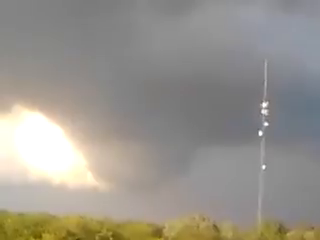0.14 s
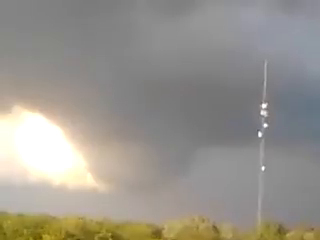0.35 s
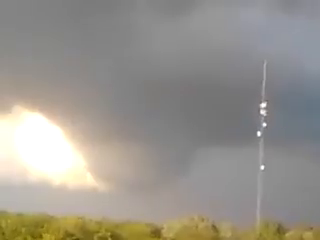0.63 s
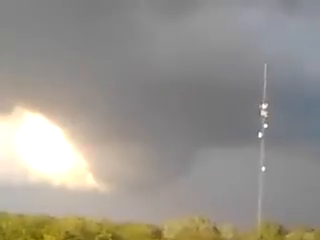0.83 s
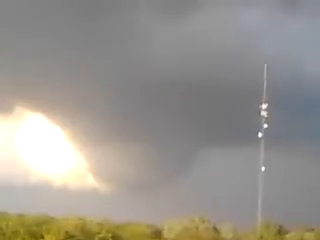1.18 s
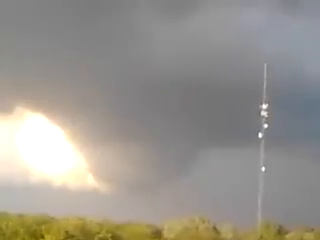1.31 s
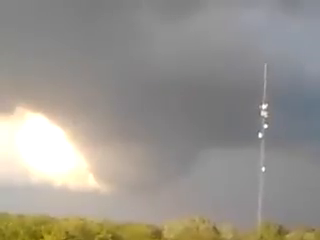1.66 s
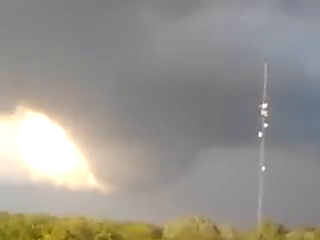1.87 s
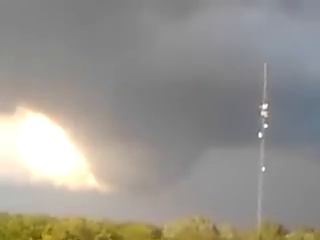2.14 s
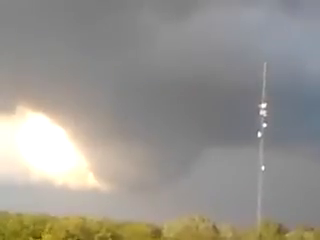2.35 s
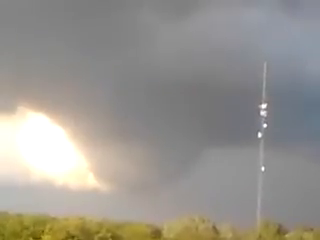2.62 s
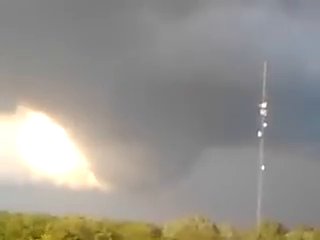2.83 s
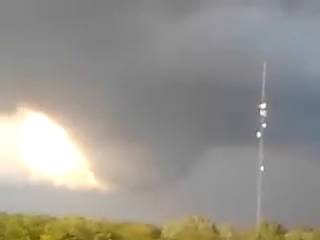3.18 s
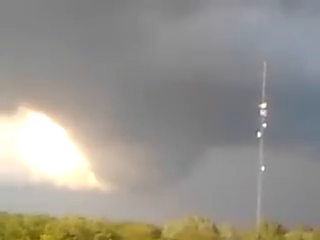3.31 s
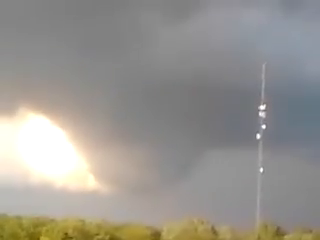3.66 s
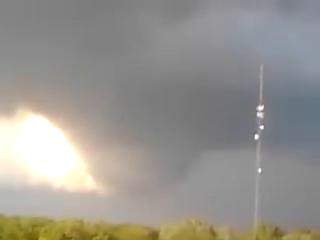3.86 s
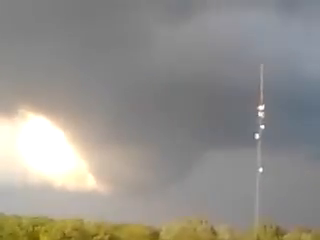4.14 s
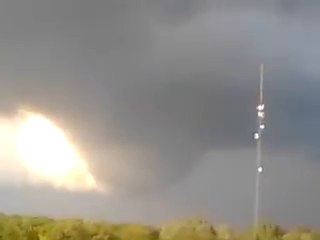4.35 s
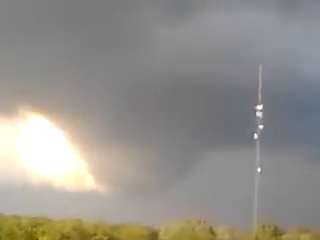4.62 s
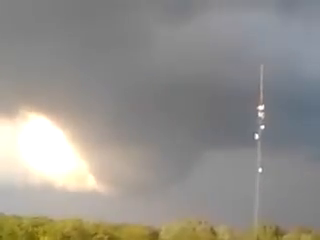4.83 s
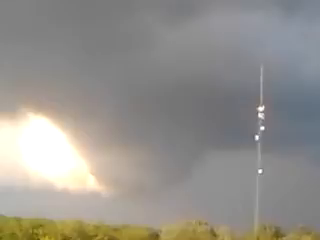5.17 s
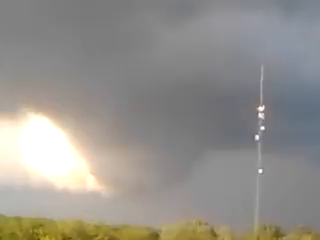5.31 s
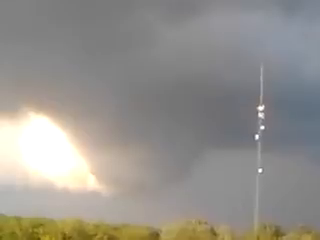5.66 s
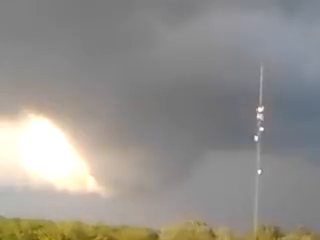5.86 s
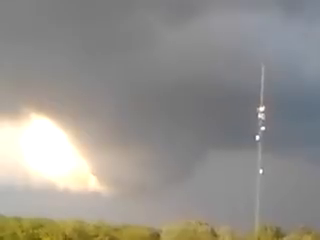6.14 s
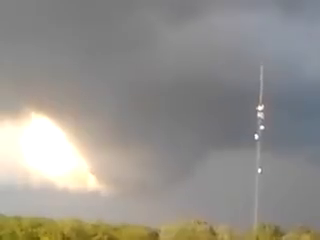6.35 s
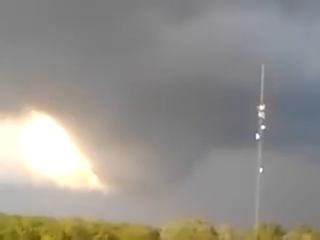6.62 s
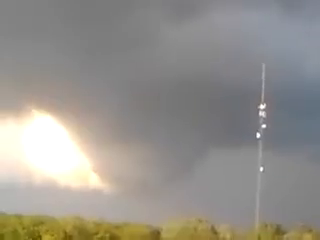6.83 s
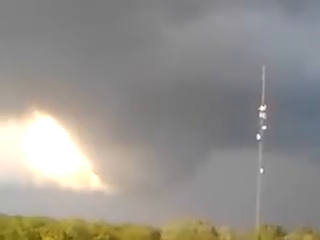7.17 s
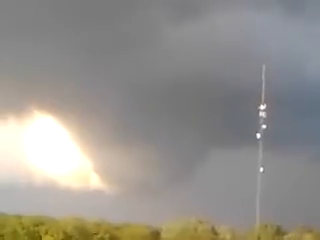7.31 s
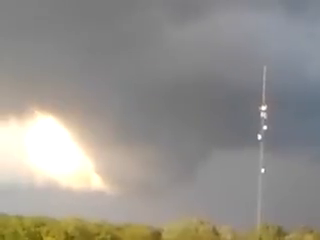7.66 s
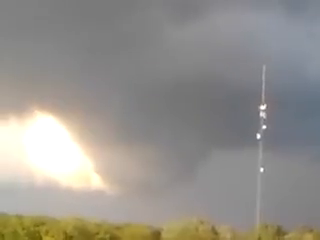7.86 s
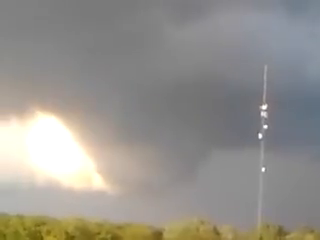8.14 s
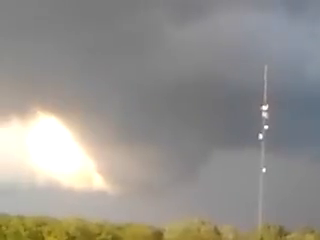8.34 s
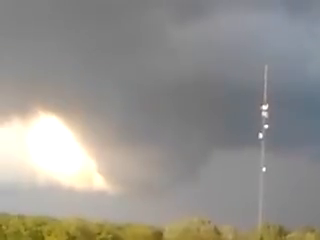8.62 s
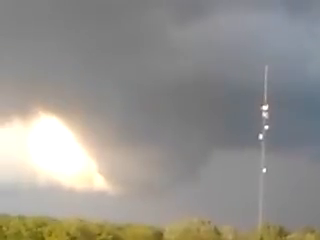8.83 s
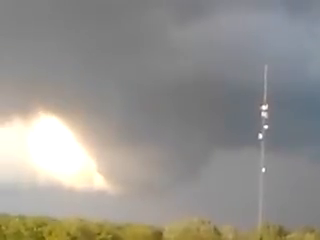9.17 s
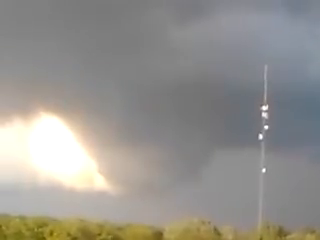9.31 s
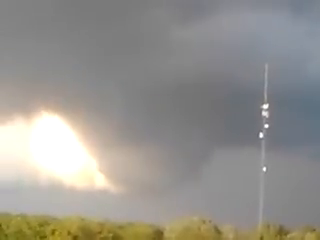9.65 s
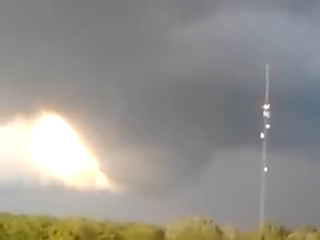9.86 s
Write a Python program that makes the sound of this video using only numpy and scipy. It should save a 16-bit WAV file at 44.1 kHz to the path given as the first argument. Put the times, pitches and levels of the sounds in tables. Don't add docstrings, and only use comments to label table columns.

```python
import sys
import numpy as np
from scipy import signal
from scipy.fft import rfft, irfft, next_fast_len
from scipy.io import wavfile
from scipy.ndimage import uniform_filter1d, map_coordinates

SR = 44100
rng = np.random.default_rng(int(sys.argv[2]) if len(sys.argv) > 2 else 0)


def dump(signal):
    limited = np.clip(np.atleast_2d(signal).T, -1, 1)
    pcm = np.round(limited * 32767).astype(np.int16)
    wavfile.write(sys.argv[1], SR, pcm)


def elevation(decibels):
    levels = np.asarray(decibels, float)
    return 10 ** (levels / 20)


N = 440559
TIME = np.arange(N) / SR

MAINS_HZ = 119.94
TURN_S = 34 / MAINS_HZ
COUNT = 35
FIRST_S, PACE_S = .139, .2837
USUAL = (-44, .092, -47)
CAMERA_SR, FRAME, FRAME_START = 16000, 1024, 21


def unit(x):
    return x / np.sqrt(np.mean(x ** 2) + 1e-20)


def along(points, hz):
    f, v = np.transpose(points)
    return np.interp(np.log(hz + 1), np.log(f + 1), v)


def filtered(x, response):
    m = next_fast_len(N + SR // 2)
    return irfft(rfft(x, m) * response(np.fft.rfftfreq(m, 1 / SR)), m)[..., :N]


def ringing(hz, width, db):
    def response(f):
        total = 0
        for k, (c, w, g) in enumerate(zip(hz, width, db)):
            total = total + (-1) ** k * elevation(g) * 1j * f * w / (c * c - f * f + 1j * f * w)
        return total
    return response


def wobble(rate):
    return map_coordinates(rng.standard_normal(int(N * rate / SR) + 4), [TIME * rate])


def rush(spectrum, patchy_db):
    z = signal.stft(rng.standard_normal(N + 512), nperseg=512)[2]
    field = uniform_filter1d(rng.standard_normal(z.shape), 5, 0)
    field = uniform_filter1d(field, 12, 1)
    patched = signal.istft(z * elevation(patchy_db * unit(field)), nperseg=512)[1][:N]
    return unit(filtered(patched, lambda hz: elevation(along(spectrum, hz))))


def effort(times, db, rise, hold, fall):
    out, t = np.zeros(N + SR), np.arange(SR // 4) / SR
    shape = np.clip(t / rise, 0, 1) ** 2 * np.exp(-np.maximum(t - rise - hold, 0) / fall)
    for s, level in zip(times, db):
        out[round(s * SR):][:len(t)] += elevation(level) * shape
    return out[:N]


def teeth(first_s, sharp):
    return unit(np.exp(sharp * np.cos(2 * np.pi * MAINS_HZ * (TIME - first_s))))


def on_beat(usual, odd):
    rows = np.array([(FIRST_S + PACE_S * k, *usual) for k in range(COUNT)])
    rows[np.round((np.transpose(odd)[0] - FIRST_S) / PACE_S).astype(int)] = odd
    return rows


# pitch in Hz, level in dB.
RUMBLE_TONE = [(15, -20.5), (30, -7), (55, -5), (90, -3), (170, -7), (300, -7.5), (500, -28.5), (800, -57)]
TRAFFIC_TONE = [(200, -38.5), (330, -1), (500, 3), (700, -1), (900, -25.5), (1200, -65)]
TYRE_TONE = [(450, -39), (700, -3), (870, 1), (1000, -2), (1200, -3.5), (1400, -7.5), (1600, -28.5),
             (2200, -63)]
FIELD_TONE = [(900, -39.5), (1500, -2.5), (2300, -4.5), (2800, 1), (3700, -2), (4400, -5.5), (4900, -1),
              (5700, 2.5), (6200, 0), (7100, -3)]
# time in seconds, tyre level in dB, hiss over the tyres in dB.
PASSING = [(0, -54, -16), (1, -56, -11.5), (3.3, -54.5, -11.5), (5.5, -55.5, -11.5), (6.2, -52.5, -11),
           (8, -55, -8.5), (8.6, -51, -8), (9, -50.5, -9.5), (9.3, -48.5, -3.5), (9.47, -47, -6.5),
           (9.6, -49, -8.5), (9.99, -47, -7.5)]


def distance():
    s, *columns = np.transpose(PASSING)
    tyre_db, over_db = [np.interp(TIME, s, c) for c in columns]
    hiss_db = tyre_db + over_db + 1.1 * wobble(2.2)
    traffic = elevation(-53 + 0.96 * wobble(1.5)) * rush(TRAFFIC_TONE, patchy_db=0.86)
    tyres = elevation(tyre_db + 0.07) * rush(TYRE_TONE, patchy_db=1.0)
    field = elevation(-51.0) * rush(FIELD_TONE, patchy_db=1.23)
    hiss_tone = [(900, -31.5), (1200, 3.5), (1500, -1), (2300, -1.0), (3000, -7), (4000, -39.0)]
    hiss = elevation(hiss_db + 1.0) * rush(hiss_tone, patchy_db=-1.4)
    rumble = elevation(-47.5 + 0.55 * wobble(1.5)) * rush(RUMBLE_TONE, patchy_db=1.24)
    return rumble + traffic + tyres + field + hiss


# start in seconds, level in dB, pitch in Hz.
KNOCKS = [
    (1.072, -34.5, 103),
    (5.621, -32, 88.7),
]


def bumps():
    out = np.zeros(N)
    for s, db, hz in KNOCKS:
        since = np.maximum(TIME - s, 0)
        out += elevation(db - 60 * since / 0.26) * np.sin(2 * np.pi * hz * since)
    return out


# multiple of the motor pitch, peak level in dB.
MOTOR = [(1, -49), (2, -46), (3, -59), (4, -61), (5, -65)]
# pitch in Hz, peak level in dB.
CASING = [(74.53, -55), (356.31, -62), (359.83, -64), (871, -67), (1191, -66)]


def machine():
    motor_hz, lead_s = 59.285, .00208
    sag_at, sag_wide, sag_db, sag_hz = .705, .06, 9.3, 10
    load_at, load_wide, load_hz = .43, .16, 6.2
    turn = TIME / TURN_S % 1
    sag = np.exp(-((turn - sag_at) / sag_wide) ** 2)
    load = np.exp(-((turn - load_at) / load_wide) ** 2)
    mean_hz = np.sqrt(np.pi) * (sag_hz * sag_wide - load_hz * load_wide)
    level_db = -42.7 + np.cos(2 * np.pi * (turn - .42)) - sag_db * sag
    hum_hz = MAINS_HZ + sag_hz * sag - load_hz * load - mean_hz
    hum = elevation(level_db) * np.cos(2 * np.pi * np.cumsum(hum_hz) / SR)
    motor = sum(elevation(db) * np.cos(2 * np.pi * k * motor_hz * (TIME + lead_s)) for k, db in MOTOR)
    casing = sum(elevation(db) * np.cos(2 * np.pi * hz * TIME) for hz, db in CASING)
    return hum + motor + casing


def tick():
    starts = .182 + TURN_S * np.arange(COUNT)
    tick_db = -61.5 + .5 * starts + 2.5 * rng.standard_normal(COUNT)
    pressure = effort(starts, tick_db + 19, rise=0.0079, hold=0.017, fall=0.0062)
    drive = pressure * teeth(.2025, sharp=0.93)
    return filtered(drive * rng.standard_normal(N), ringing(hz=[2930, 3150], width=[330, 300], db=[0, -5]))


BUZZ_HZ = [4936, 5197, 5305, 5394, 5427, 5453, 5512, 5564, 5641, 5668, 5757, 5827, 5924, 6050, 6177, 6800,
           5550]
# width in Hz, level in dB.
BUZZ_RING = [(30, -17), (25.2, -8.5), (26.8, -1.5), (13.9, -0.5), (10.8, 0), (14, -9.5), (22, -11),
             (12.3, 2.5), (18.1, -0.5), (20, -7), (12.7, -8), (41.3, -10), (48, -9.5), (40.3, -14),
             (79.6, -24), (680, -27), (466, -18.5)]
# time in seconds, level in dB.
VIGOUR = [(.15, -50), (.43, -54.5), (1.0, -49.5), (1.28, -48), (1.57, -51.5), (1.85, -47), (2.99, -49),
          (3.55, -47.5), (4.69, -52), (4.97, -48), (5.54, -46.5), (6.1, -51), (6.39, -47.5), (7.24, -47.5),
          (7.8, -52.5), (8.94, -49.5), (9.5, -49.5), (9.79, -52)]


def buzz():
    starts = .145 + TURN_S * np.arange(COUNT)
    buzz_db = np.interp(starts, *np.transpose(VIGOUR))
    since = (TIME - starts[0]) % TURN_S
    tooth_row = rng.standard_normal(round(TURN_S * SR) + 1)[(since * SR).astype(int)]
    climb = np.sin(2 * np.pi * (5220 * since + 4300 * since ** 2)) * np.exp(-since / 0.041)
    scrape = 0.7 * tooth_row + 0.65 * rng.standard_normal(N) + 0.6 * climb
    drive = scrape * teeth(.1545, sharp=1.8)
    swell = effort(starts, buzz_db + 20.5, rise=.012, hold=0.015, fall=.024)
    drag = effort(starts, buzz_db + 13.0, rise=0.03, hold=0.056, fall=.065)
    edge = effort(starts + 0.011, buzz_db + 5.5, rise=.02, hold=0.014, fall=.02) * drive
    rasp = signal.lfilter(*signal.butter(2, [5700, 6450], "band", fs=SR), edge)
    return rasp + filtered((swell + drag) * drive, ringing(BUZZ_HZ, *np.transpose(BUZZ_RING)))


STROKE_HZ = [3959, 4015, 4091, 4131, 4200, 4365, 4443, 4489, 4560, 4060, 4270]
# width in Hz, first stroke in dB, second stroke in dB.
STROKE_RING = [(24.4, -3, -31.5), (26, -4.5, -16.5), (19.9, 0, -10.5), (20.2, -1.5, -7.5),
               (24.7, -10, -16.5), (17.2, -2.5, -10), (9.74, 6, 3.5), (14.7, -5.5, -3), (151, -14.5, -19),
               (264, -13.5, -25.5), (120, -14.5, -21.5)]


def stroke(pressure, scrape, db, held_db):
    modes = ringing(STROKE_HZ, np.transpose(STROKE_RING)[0], db)
    song = unit(filtered(scrape, modes))
    even = song / np.sqrt(np.abs(uniform_filter1d(song ** 2, size=600)) + 0.036)
    return filtered(pressure * scrape, modes) + elevation(held_db) * pressure * even


# start in seconds, first stroke in dB, wait in seconds,
# second stroke in dB.
CHIRPS = [(0.141, -43.5, 0.1, -46.5), (0.428, -42, 0.1, -45), (0.707, -42.5, 0.099, -45),
          (0.991, -44.5, 0.088, -49), (1.277, -45, 0.086, -48), (1.55, -46.5, .093, -46),
          (2.126, -43, .082, -46), (2.413, -43.5, .074, -45), (2.689, -44, 0.087, -44.5),
          (2.975, -45.5, 0.083, -43.5), (3.254, -44.5, 0.089, -46), (3.547, -43, 0.083, -46),
          (3.822, -43, 0.097, -52), (4.106, -44.5, 0.1, -49), (4.389, -46, .097, -45.5),
          (4.678, -46.5, .092, -44.5), (4.963, -45, 0.1, -49.5), (5.247, -43.5, 0.1, -49.5),
          (5.536, -44, 0.08, -47), (6.097, -41.5, .096, -46), (6.666, -44.5, .088, -44),
          (7.236, -42.5, 0.094, -48), (7.521, -41, 0.095, -46), (8.087, -43.5, .096, -44),
          (8.365, -43.5, .1, -46), (8.651, -44.5, 0.097, -49.5), (8.939, -43.5, 0.089, -49),
          (9.215, -42.5, 0.11, -47), (9.507, -43.5, .098, -48.5), (9.782, -42.5, 0.095, -45)]


def strokes():
    s1, db1, wait, db2 = on_beat(USUAL, CHIRPS).T
    s2 = s1 + wait
    first_db, second_db = np.transpose(STROKE_RING)[1:]
    scrape = rng.standard_normal((2, N)) * teeth(.147, sharp=0.73)
    first = effort(s1 - .001, db1 + 9, rise=0.0042, hold=0.018, fall=0.029)
    second = effort(s2 - .001, db2 + 12.0, rise=0.0016, hold=0.023, fall=0.022)
    third = effort(s2 + 0.078, db2 - 5, rise=0.0076, hold=0.015, fall=0.029)
    earlier = effort([.001, .05], [-37, -43], rise=.002, hold=0.0071, fall=0.014)
    restless = elevation(-58 + 2.7 * wobble(11))
    later = second + third + earlier + restless
    return stroke(first, scrape[0], first_db, held_db=-11.5) + stroke(later, scrape[1], second_db, held_db=-11.0)


def scene():
    return (strokes() + buzz() + tick() + machine() + bumps() + distance())[None]


# time in seconds, frames.
RUNS = [(.14, 3), (.99, 0), (1.28, 1), (1.84, 1), (3.0, 2), (3.58, 1), (3.82, 1), (4.39, 11), (6.1, 1),
        (6.38, 1), (6.67, 3), (6.95, 1), (7.24, 3), (7.52, 3), (8.09, 1), (8.65, 1), (8.94, 1), (9.22, 5),
        (9.5, 1), (9.78, 1)]


def short_frames(pip_s):
    s, frames = on_beat([2], RUNS).T
    strokes_s = on_beat(USUAL, CHIRPS)[:, 0]
    s = np.where(np.abs(s - strokes_s) < .02, strokes_s, s)
    first = np.ceil((s - .005 - pip_s) * CAMERA_SR / FRAME).astype(int)
    runs = [k + np.arange(int(n)) for k, n in zip(first, frames)]
    return pip_s + np.unique(np.concatenate(runs)) * FRAME / CAMERA_SR


# pitch in Hz, step over the local loudness in dB.
COARSE = [(1500, -18), (3000, -4), (3800, -.5), (5000, 0), (7000, 0)]


def rounded(x, size, top_hz, group, starve):
    n, k = np.arange(2 * size)[:, None] + .5, np.arange(size) + .5
    hz = k * CAMERA_SR / size / 2
    basis = np.sqrt(2 / size) * np.sin(np.pi * n / size / 2) * np.cos(np.pi / size * (n + size / 2) * k)
    lead = FRAME + FRAME // 2 + size // 2 if size < FRAME else 2 * FRAME
    tail = 3 * FRAME - (len(x) + lead - FRAME_START) % FRAME
    blocks = np.pad(x, (lead - FRAME_START, tail)).reshape(-1, size)
    bins = np.hstack([blocks[:-1], np.roll(blocks, -1, 0)[:-1]]) @ basis
    per_frame = FRAME // size
    bins = bins[:len(bins) // per_frame * per_frame].reshape(-1, per_frame, size)
    loudness = np.mean(bins ** 2, 1, keepdims=True) ** .25
    mask = uniform_filter1d(loudness, size=size // 16, axis=2) ** 4
    step = np.sqrt(mask + 1e-14) * elevation(along(COARSE, hz))
    near = np.mean(bins.reshape(*bins.shape[:2], -1, group) ** 2, axis=3).repeat(group, axis=2)
    bins = bins * (near > starve * step ** 2) * (hz < top_hz)
    levels = np.sign(bins) * np.floor(np.abs(bins) / step + .4) * step
    halves = levels.reshape(-1, size) @ basis.T
    out = halves[1:, :size] + halves[:-1, size:]
    return out.ravel()[lead - FRAME_START - size:][:len(x)]


def top_cut(x):
    return signal.sosfilt(signal.butter(12, 9150, fs=SR, output="sos"), x)


# pitch in Hz, level in dB.
EDGE = [(7050, 0.5), (7250, -2.5), (7400, -20.5), (7500, -69.5)]
# pitch in Hz, level in dB.
MIRROR = [(7500, 0), (8250, 0), (8350, -59.5), (8550, -34.5), (8750, -24.5), (9050, -40), (9300, -78.5)]


def record(dry):
    s = short_frames(pip_s=.0296)
    narrow = filtered(dry[0], lambda hz: elevation(along(EDGE, hz)))
    slow = signal.resample_poly(narrow, up=160, down=441)
    at = np.round(s * CAMERA_SR).astype(int)
    short = np.convolve(np.bincount(at - 448, minlength=len(slow)), np.ones(FRAME), "same")
    short = np.clip(uniform_filter1d(short, size=128), 0, 1)
    quick = rounded(slow, 128, top_hz=7500, group=4, starve=.28)
    calm = rounded(slow, FRAME, top_hz=7280, group=16, starve=1.45)
    slow = short * quick + (1 - short) * calm
    pip_db = -76.5 + 2.5 * rng.standard_normal(len(at))
    pips = np.convolve(np.bincount(at, elevation(pip_db), len(slow)), np.hanning(170) ** 0.45, "same")
    slow += pips * (-1) ** np.arange(len(slow))
    images = rfft(np.kron(slow, [3, 0, 0]))
    images *= elevation(along(MIRROR, np.fft.rfftfreq(3 * len(slow), 1 / CAMERA_SR / 3)))
    fast = signal.resample_poly(irfft(images, 3 * len(slow)), up=147, down=160)[None, :N]
    mix = fast + .0034
    return top_cut(mix)


dry = scene()
out = record(dry)
dump(out)
```